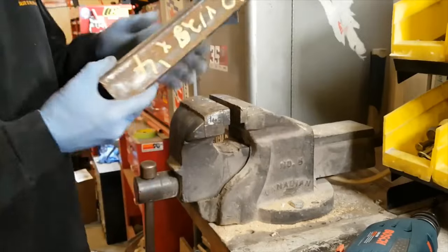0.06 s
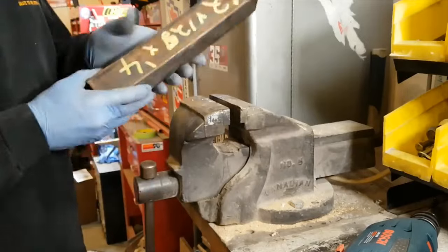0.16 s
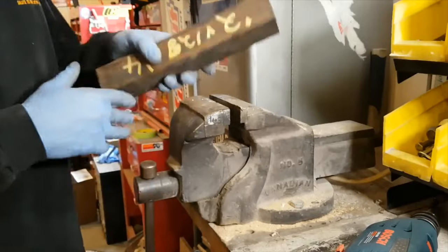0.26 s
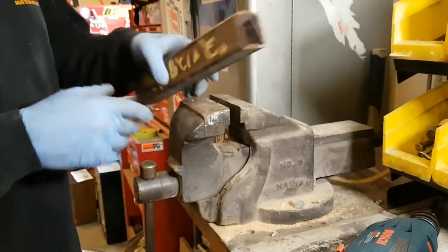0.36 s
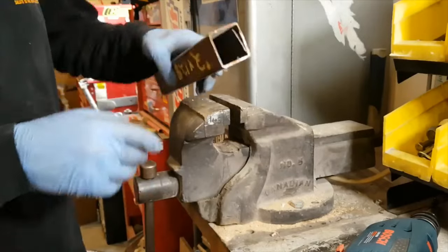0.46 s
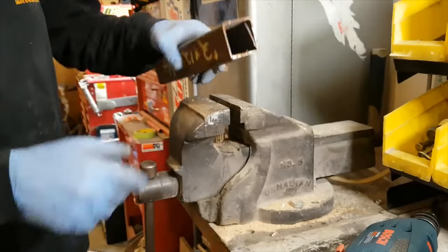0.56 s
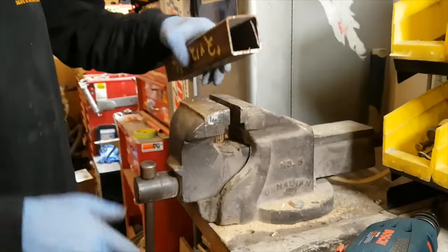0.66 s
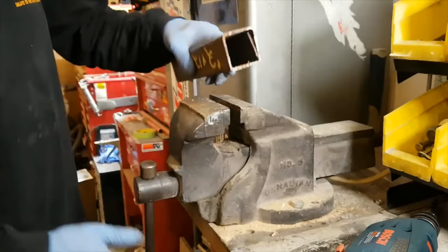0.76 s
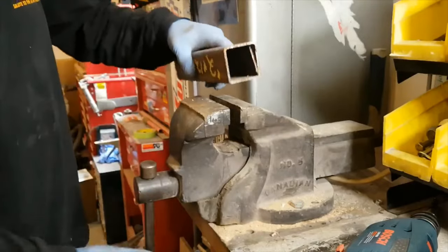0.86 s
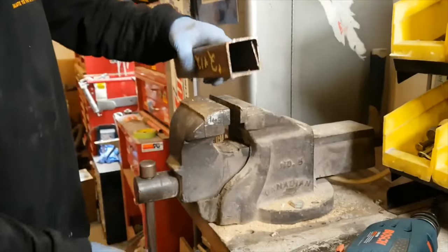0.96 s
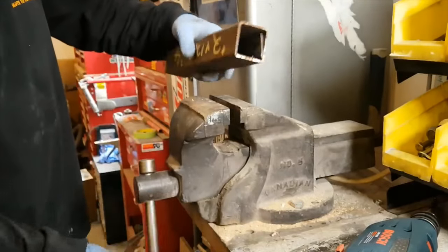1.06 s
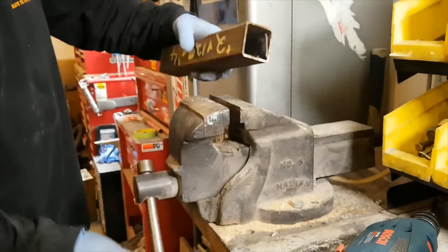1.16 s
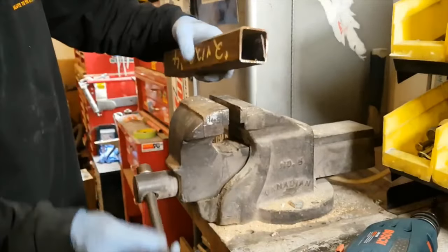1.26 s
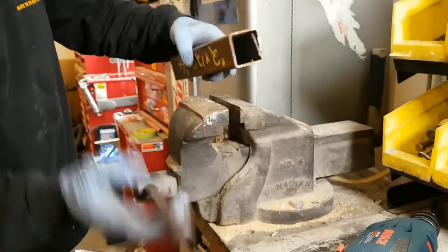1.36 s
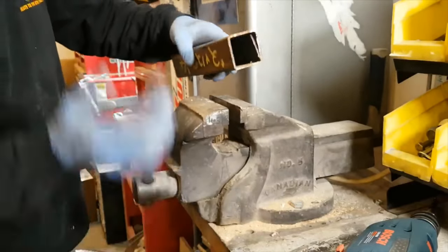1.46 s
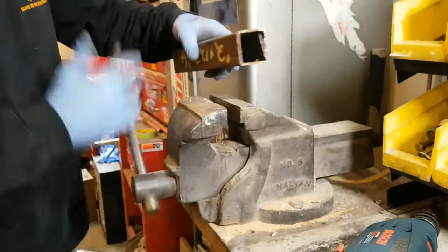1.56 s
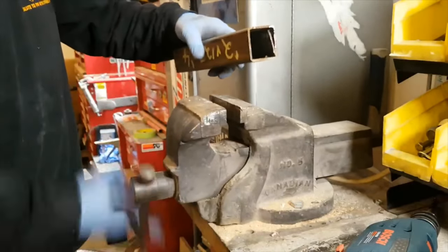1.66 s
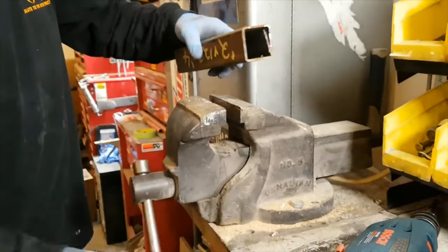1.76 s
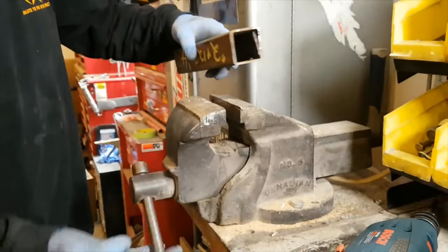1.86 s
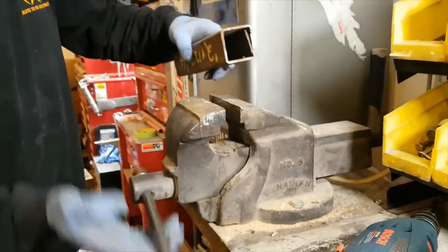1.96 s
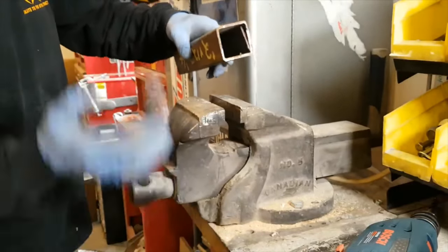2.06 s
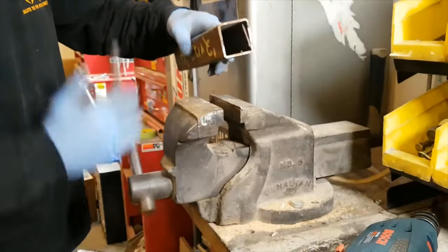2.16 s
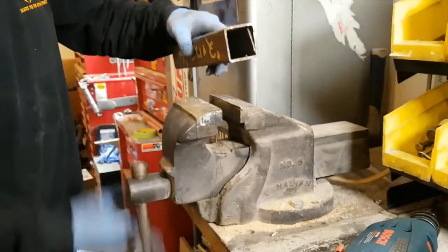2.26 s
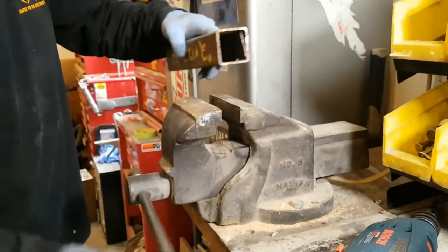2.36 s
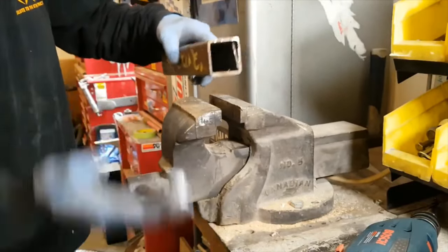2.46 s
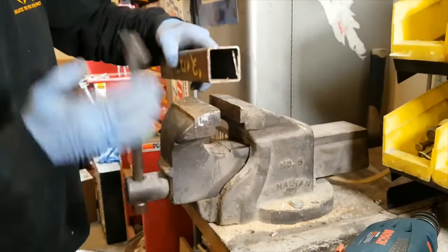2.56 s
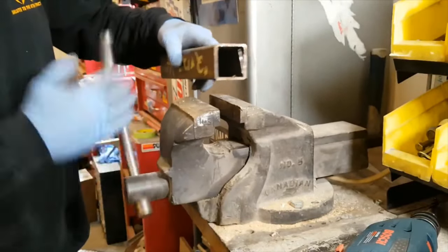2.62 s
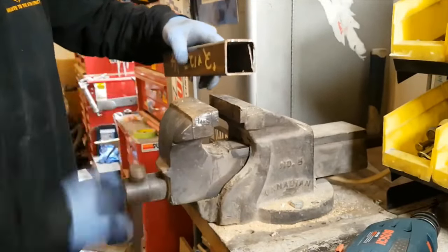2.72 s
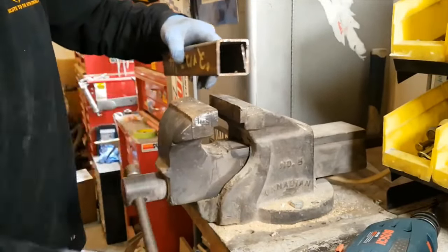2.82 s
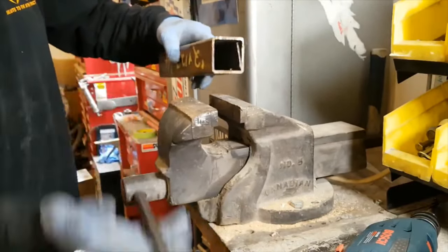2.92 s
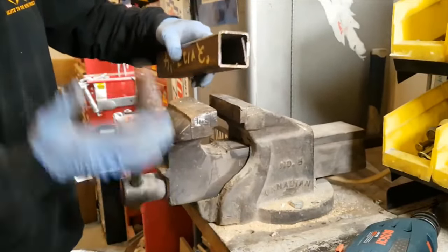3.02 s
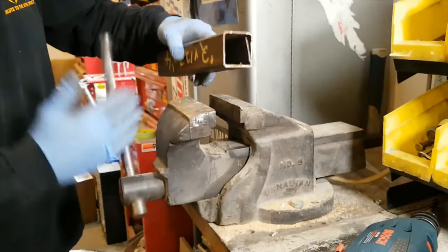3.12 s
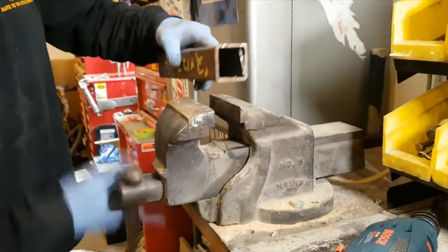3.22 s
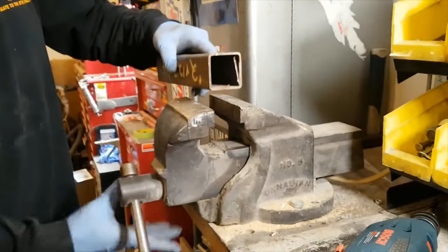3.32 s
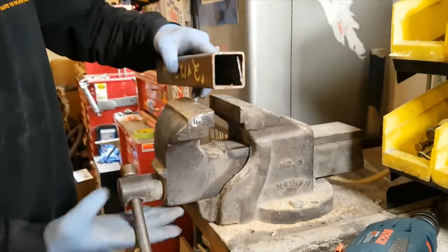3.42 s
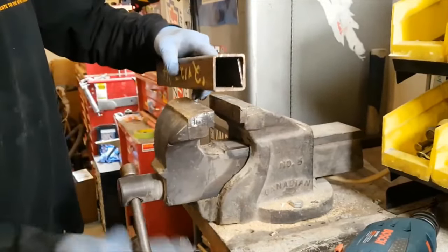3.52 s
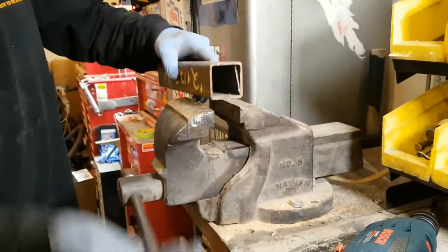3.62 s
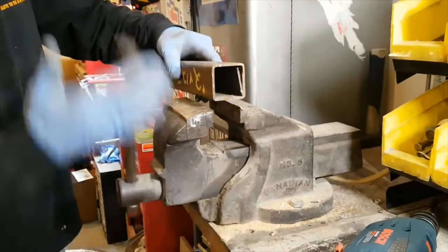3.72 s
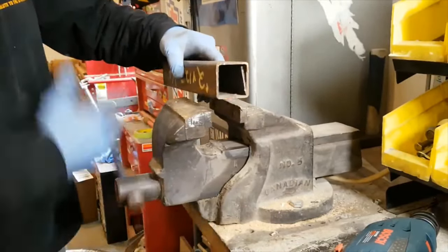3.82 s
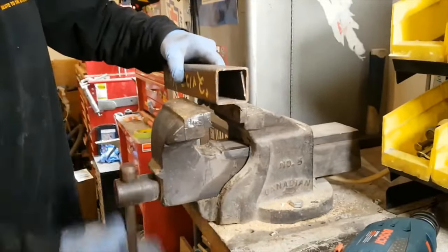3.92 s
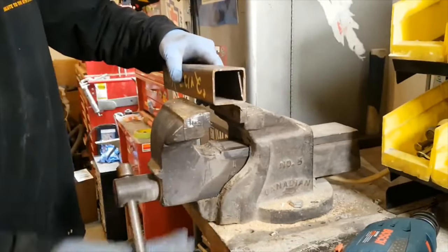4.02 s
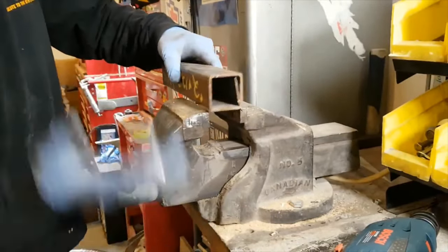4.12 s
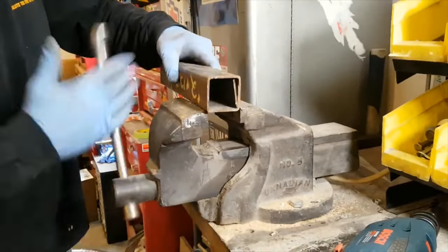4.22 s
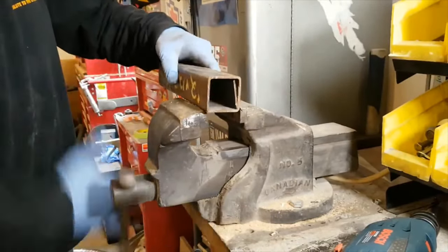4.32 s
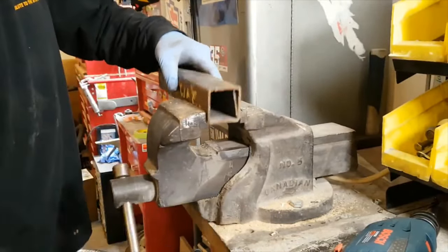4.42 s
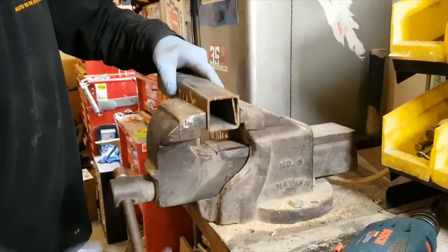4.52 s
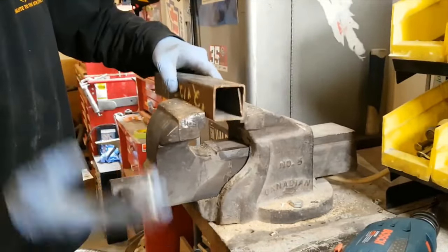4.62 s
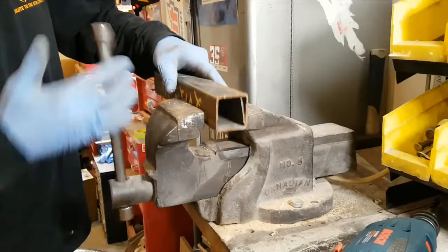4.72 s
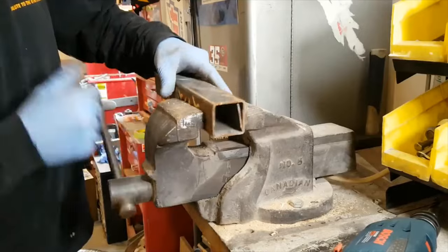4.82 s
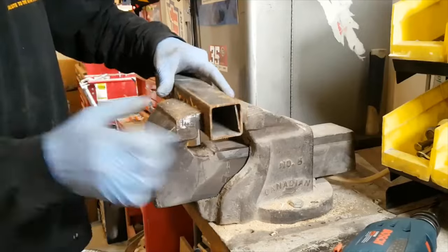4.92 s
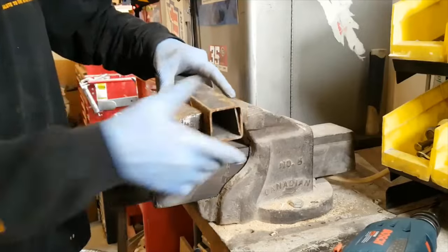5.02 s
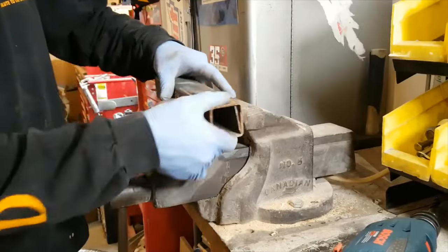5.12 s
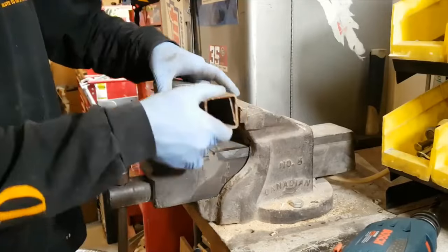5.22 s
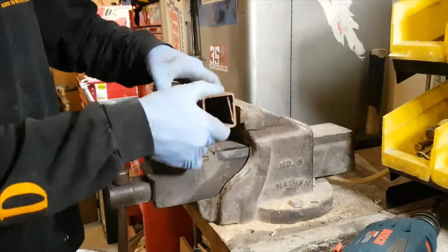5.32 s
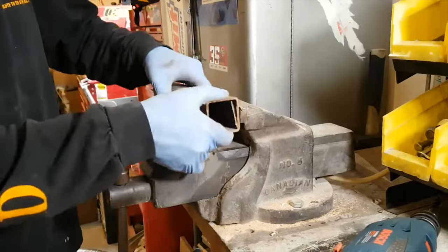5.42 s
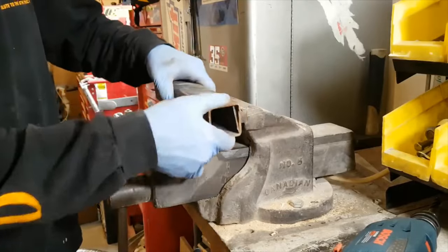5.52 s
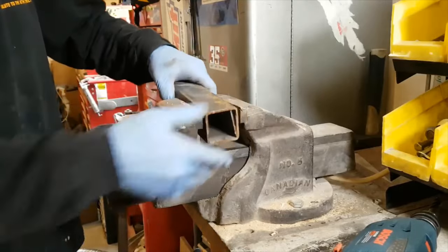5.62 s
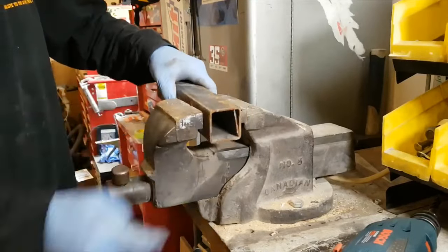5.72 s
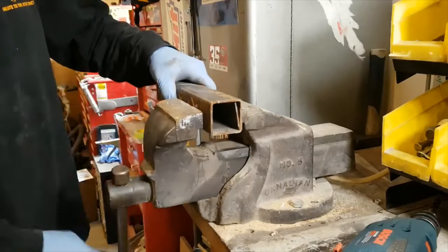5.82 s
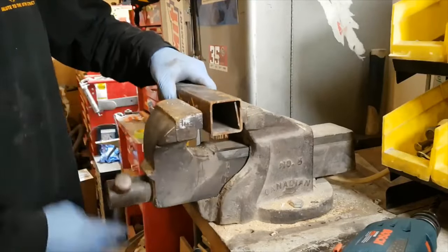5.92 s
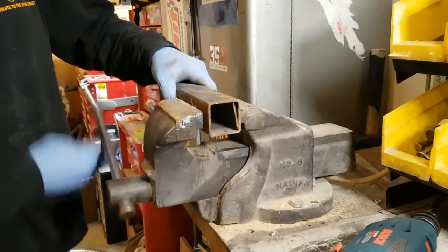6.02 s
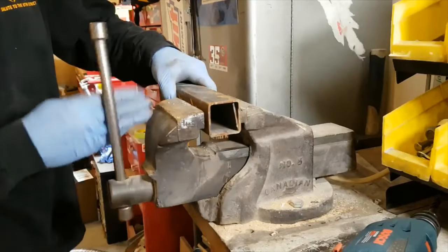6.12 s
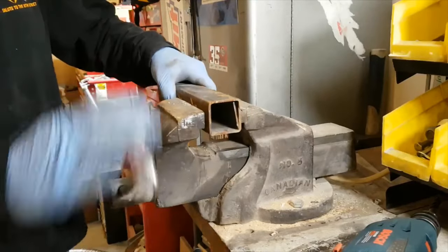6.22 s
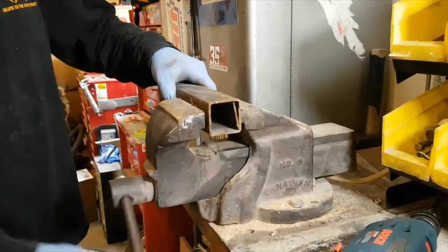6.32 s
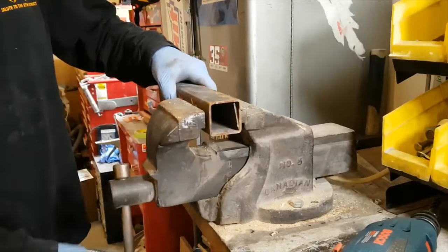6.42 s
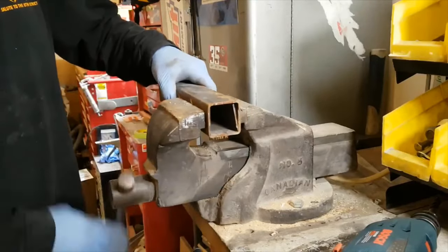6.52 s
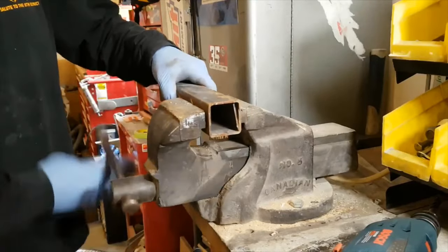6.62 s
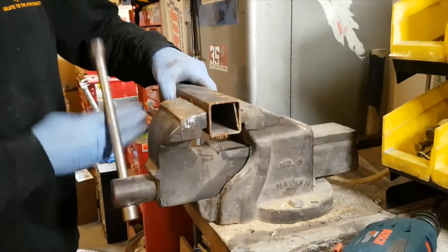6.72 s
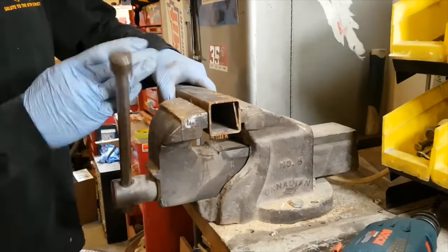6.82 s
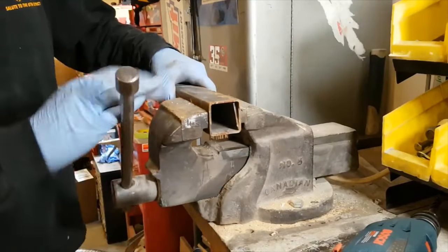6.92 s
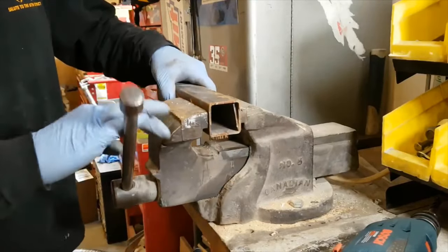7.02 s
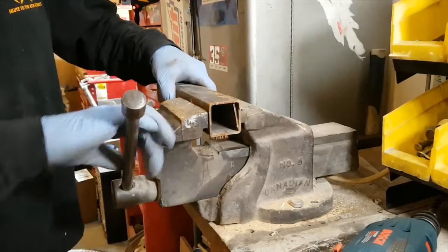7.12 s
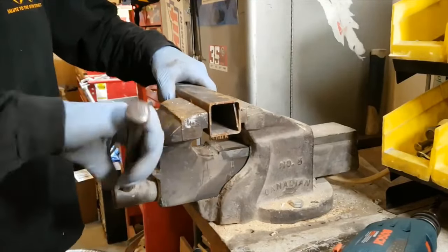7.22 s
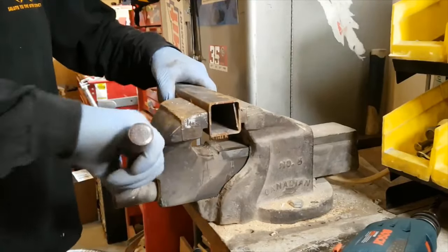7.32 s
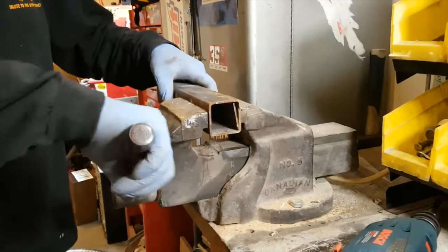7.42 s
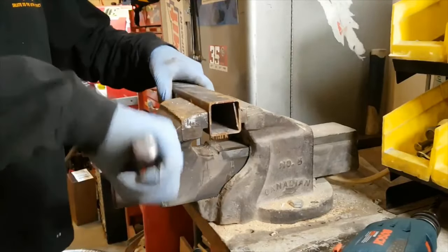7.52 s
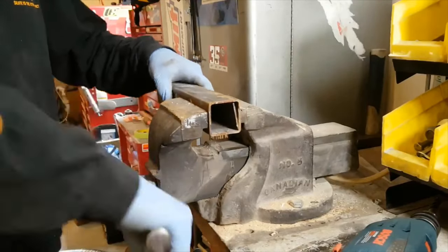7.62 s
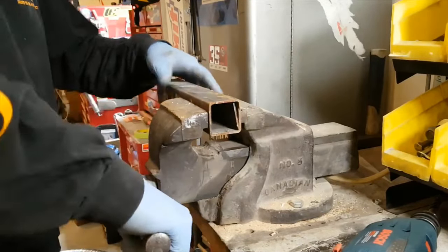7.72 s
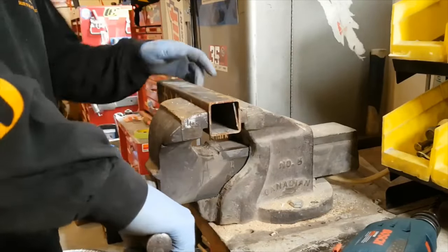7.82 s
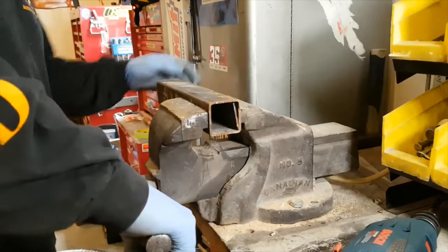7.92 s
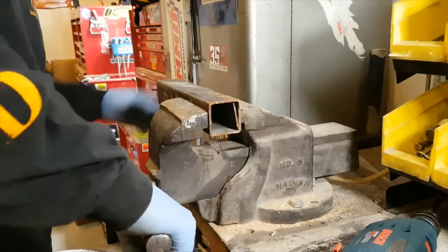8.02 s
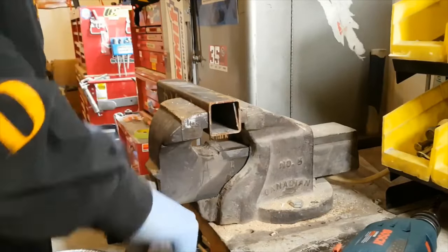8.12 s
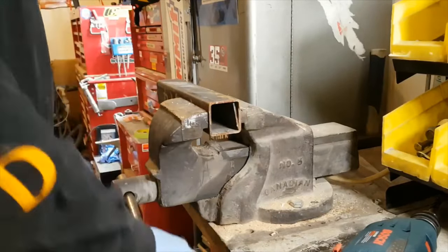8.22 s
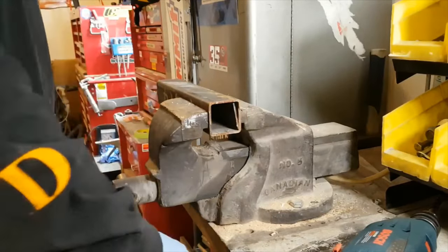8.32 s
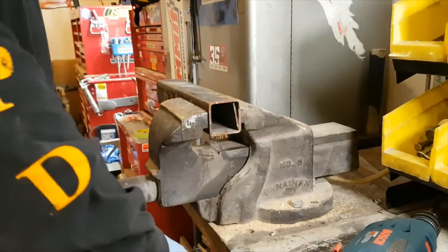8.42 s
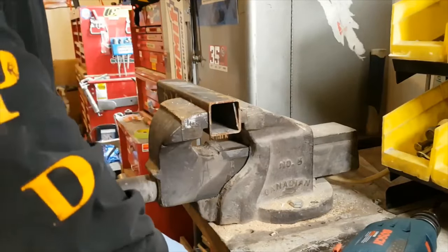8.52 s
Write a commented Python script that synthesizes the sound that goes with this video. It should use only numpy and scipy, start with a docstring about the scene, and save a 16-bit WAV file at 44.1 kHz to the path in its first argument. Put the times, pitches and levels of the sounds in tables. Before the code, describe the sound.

Quiet room air and a steady, slightly wavering hum lie under everything. After about a second of light glove rubbing, a heavy cast-iron vise rattles and knocks with each push of its loose handle. The blows are woody-dull below and metallic on top, with short shop echoes. Bright tube clinks and plate pings come in the middle, then a short scrape, final hard clanks, a pause, a soft sleeve rub and faint clinks. Close microphones.

```python
"""Over the quiet air of a workshop, steady noise, a motor hums in wavering sine tones.
Gloves rustle first, as coloured noise grains; then the handle of a heavy bench vise is spun by one hand
while the other holds a square steel tube. Loose screw and jaw knock and judder: clicks drive body resonances.
Jaw plate pings, tube and handle bar clinks, a scrape of the tube and clanks of the collar join as decaying
modes; a few clinks and a last soft rub close the scene. Near sounds excite the sparse echoes of the shop."""
import sys
import numpy as np
from scipy import signal
from scipy.fft import rfft, irfft
from scipy.io import wavfile
from scipy.ndimage import uniform_filter1d

SR = 44100
rng = np.random.default_rng(int(sys.argv[2]) if len(sys.argv) > 2 else 0)


def file_out(sig):
    """Save sig as 16-bit WAV at sys.argv[1]."""
    # one column per channel
    cols = np.atleast_2d(sig).T
    # limit, then scale
    lim = np.clip(cols, -1, 1)
    pcm = np.round(lim * 32767).astype(np.int16)
    wavfile.write(sys.argv[1], SR, pcm)


N = 377937


def amp(db):
    """Decibel law: amplitude ratio of a level."""
    return 10 ** (np.asarray(db) / 20)


def evened(x):
    """Power normalization: scale to rms 1."""
    return x / np.sqrt(np.mean(x ** 2) + 1e-20)


def read(points, hz):
    """Interpolation of a curve along logarithmic frequency."""
    f, value = np.transpose(points)
    return np.interp(np.log(hz + 1), np.log(f + 1), value)


def add(mix, s, sound):
    """Superposition: sound joins mix at time s, cut off at its end."""
    part = mix[round(s * SR):][:len(sound)]
    part += sound[:len(part)]


def causal(db):
    """Minimum phase: the most prompt causal response with this gain shape, energy 1."""
    log_gain = np.log(amp(np.r_[db, db[-2:0:-1]]))
    phase = -signal.hilbert(log_gain).imag
    response = np.fft.ifft(np.exp(log_gain + 1j * phase)).real[:len(db)]
    return response / np.linalg.norm(response)


def sparse(per_s, spread_db):
    """Random impulse train: clicks of random sign and moment, a few much larger; rms 1."""
    size = amp(spread_db * np.minimum(rng.exponential(1, N), 4)) * rng.choice([-1, 1], N)
    return evened(size * (rng.random(N) < per_s / SR))


def slow_noise(shape, width):
    """Smoothed noise: two moving averages of width samples leave only slow changes."""
    return evened(uniform_filter1d(uniform_filter1d(rng.standard_normal(shape), width), width))


# colour of the air noise: (f/Hz, relative level/dB)
AIR_COLOUR = [(20, -27), (60, -16), (100, -16), (250, -16), (420, -19), (860, -27.5), (2000, -33),
              (5000, -42.5), (16000, -47)]
# left-right correlation of the air noise: (f/Hz, correlation)
AIR_CORRELATION = [(100, 0.32), (400, 0.34), (1500, 0.071), (5000, 0.0545)]
AIR_DB = -58  # rms over both ports


def air():
    """Partial coherence: steady coloured noise, partly shared by the two ports."""
    hz = np.fft.rfftfreq(N, 1 / SR)
    left, other = rfft(rng.standard_normal((2, N)))
    same = np.clip(read(AIR_CORRELATION, hz), -1, 1)
    right = same * left + np.sqrt(1 - same ** 2) * other
    noise = irfft(amp(read(AIR_COLOUR, hz)) * np.array([left, right]), N)
    return amp(AIR_DB) * evened(noise)


# motor tones: (f/Hz, rms level/dB midway between the ports), about which each tone wavers
HUM_TONES = [(118.4, -51), (253.0, -63.5), (419.9, -65.5), (506.0, -74.5)]


def motor_hum():
    """Amplitude and frequency modulation: motor tones waver slightly, louder in the right port."""
    t, tones = np.arange(N) / SR, 0
    for f, db in HUM_TONES:
        waver = slow_noise(N, 6000)
        phase = 2 * np.pi * f * t + np.cumsum(waver) * 2.3 / SR  # 2.3 rad/s rms deviation
        tones = tones + np.sqrt(2) * amp(db + 0.43 * waver) * np.sin(phase)
    return tones * amp([[-1.2], [1.2]])


# rubs of glove and sleeve: (middle t/s, relative level/dB, half length to 1/e t/s, tilt/dB per octave)
GLOVE_RUBS = [(0.018, -60, 0.025, 6), (0.264, -57, 0.048, 0), (0.309, -53.5, 0.018, 2),
              (0.435, -61, 0.057, -2), (0.601, -59, 0.028, 1), (1.178, -64, 0.027, 3),
              (3.622, -58, 0.038, 3.5), (5.198, -61, 0.061, -1.5), (6.337, -58, 0.071, 2),
              (7.269, -64.5, 0.099, 3), (7.535, -62, 0.059, 0), (7.744, -51.5, 0.1, -5),
              (8.448, -53, 0.29, -8)]
# colour of rubbed cloth before each rub's tilt: (f/Hz, relative level/dB)
CLOTH_COLOUR = [(300, -5), (1200, -1), (3000, 1), (6000, -4), (12000, -1), (16000, -7)]
# bright ticks of glove and handle ends: (t/s, relative peak level/dB, t60/s)
GLOVE_TICKS = [(1.844, -50.5, 0.083), (2.465, -43.5, 0.082), (2.933, -39.5, 0.048), (3.2784, -36, 0.014),
               (3.4175, -40.5, .07), (4.534, -40, 0.12), (5.894, -45, 0.067), (8.2165, -52, 0.046)]


def gloves():
    """Friction noise: grains of rubbing cloth and nitrile, unlike at the two ports, and short bright ticks."""
    hz = np.fft.rfftfreq(1024, 1 / SR)
    t = np.arange(SR // 2) / SR - .25  # each sound is centred on its moment
    out = np.zeros((2, N + SR))
    for s, db, half, tilt_db in GLOVE_RUBS:
        grains = rng.standard_normal((2, len(t))) * amp(0.99 * rng.standard_normal((2, len(t))))
        colour = causal(read(CLOTH_COLOUR, hz) + tilt_db * np.log2((hz + 200) / 4000))
        rub = signal.oaconvolve(amp(db) * grains * np.exp(-(t / half) ** 2), colour[None])
        add(out.T, s, rub.T)
    bright = causal(read([(2000, -8.0), (6000, -10.0), (10000, -7.0), (16000, -9.5)], hz))
    for s, peak_db, t60 in GLOVE_TICKS:
        envelope = amp(peak_db - 60 * np.maximum(t, 0) / t60) * np.clip(20 * t / t60, 0, 1)
        burst = envelope * rng.standard_normal((2, len(t)))
        crossed = burst + 0.13 * burst[::-1]  # each port hears a little of the other
        add(out.T, s, signal.oaconvolve(crossed, bright[None]).T)
    return out[:, SR // 4:][:, :N]


# decay of the shop by band: (f/Hz, t60/s)
SHOP_DECAY = [(80, 0.44), (250, 0.71), (700, 0.46), (2000, 0.4), (5000, 0.63), (12000, 0.76)]
# left-right correlation of the reflections: (f/Hz, correlation)
TAIL_CORRELATION = [(100, .95), (400, .7), (1500, .3), (4000, 0)]


def shop(x):
    """Reverberation: sparse reflections of random sign decay by band; the ports share mostly the bass."""
    taps = np.zeros((2, SR))
    at = np.arange(60, SR - 20, 20) + rng.integers(0, 20, (2, (SR - 61) // 20))  # one in 20 samples
    np.put_along_axis(taps, at, rng.choice([-1., 1.], at.shape), 1)
    hz, t, z = signal.stft(taps, SR, nperseg=512)
    same = np.clip(read(TAIL_CORRELATION, hz), 0, 1)[:, None]
    z = np.array([z[0], same * z[0] + np.sqrt(1 - same ** 2) * z[1]])
    early = 1 + 1.62 * amp(-60 * t / 0.09)  # bench and wall answer first
    fall = amp(-60 * t / read(SHOP_DECAY, hz)[:, None]) * early
    tail = signal.istft(z * fall, SR, nperseg=512)[1]
    return signal.fftconvolve(x[None], tail / np.linalg.norm(tail[0]), axes=1)[:, :N]


BITE_DB, BITE_S = 16, 0.006  # a stroke starts this much fainter; time constant of its bite
LET_GO_DB_PER_S = 326.5  # how fast a stroke stops
COAST_DB, COAST_DB_PER_S = -12.5, 90.5  # the loose parts rattle on, fainter and dying more slowly


def strokes(rows):
    """Envelope of forced motion, level in dB: each stroke bites quickly, holds, lets go and coasts."""
    out, t = np.full(N, -120.), np.arange(N) / SR
    for s, length, first_db, last_db, *_ in rows:
        after = np.maximum(t - s - length, 0)
        fall = np.maximum(-LET_GO_DB_PER_S * after, COAST_DB - COAST_DB_PER_S * after)
        bite = -BITE_DB * np.exp(-np.maximum(t - s, 0) / BITE_S)
        hold = np.interp(t, [s, s + length], [first_db, last_db]) + bite
        out = np.where(t < s, out, np.maximum(out, hold + fall))
    return out


# judder of the screw under pushes on the handle, before the body shares:
# (start t/s, length t/s, first drive level/dB, last drive level/dB, load on the bench level/dB)
SCREW_TURNS = [(1.451, 0.014, -42.5, -31, 5.5), (1.461, 0.11, -16, -11.5, 0.5),
               (2.072, 0.025, -19, -14, -4), (2.109, 0.076, -13, -12, 0), (2.603, 0.018, -27, -25, 4.5),
               (2.62, 0.028, -18, -14, -5.5), (2.648, 0.035, -10, -15, -1), (2.8, 0.015, -23.5, -43, 0.5),
               (3.695, 0.073, -21, -17, 1.5), (3.77, 0.12, -11, -19.5, 2.5), (4.128, .03, -27.5, -21, 3.5),
               (4.165, 0.11, -15.5, -10.5, 1.5), (4.643, 0.36, -16.5, -18, 2),
               (4.954, 0.024, -18, -17, -5.5), (5.907, 0.08, -35.5, -41.5, 6),
               (5.994, 0.084, -14.5, -18.5, -1), (6.136, 0.097, -13.5, -13.5, 1),
               (6.759, 0.041, -19, -15, 1.5), (6.82, 0.024, -15.5, -9, -5)]
# knocks of jaw and handle: (t/s, drive peak level/dB, hardness: 0 dull thud into the bench, 1 steel on steel)
JAW_KNOCKS = [(1.093, -43.5, 0.069), (1.156, -27, 0.042), (1.499, -10, 0.83), (1.528, -12, 0.49),
              (1.567, -17, 0.48), (2.004, -19.5, 0.23), (2.324, -10, 0.48), (2.411, -5, 0.56),
              (2.806, -14, 0.46), (2.982, -25.5, 0.077), (3.119, -20.5, 0.23), (3.15, -18.5, 0.29),
              (3.187, -17.5, 0.36), (3.295, -10.5, 0.5), (3.306, -17, 0.17), (3.617, -32.5, 0.35),
              (3.702, -8, 0.61), (3.726, -6.5, 0.67), (3.779, -9, 0.78), (3.962, -18.5, 0.76),
              (4.162, -6.5, 0.69), (4.468, -19, 0.82), (4.605, -17, 0.63), (4.683, -21.5, .5),
              (4.721, -6, 0.71), (4.805, -5.5, 0.67), (4.83, -11, 0.78), (4.984, -5.5, 0.54),
              (5.265, -30, 0.15), (5.741, -21.5, 0.74), (5.904, -22, 0.7), (5.978, -9, 0.49),
              (6.191, -8, 0.67), (6.766, -12, 0.87), (8.352, -32.5, 0.83), (8.438, -26.5, 0.78),
              (8.529, -31.5, 0.86)]
# broad colour of the vise: (f/Hz, relative level/dB)
VISE_COLOUR = [(30, -30.5), (86, -5), (252, -5.5), (404, -3.5), (684, -1.5), (1390, -3), (1810, -9),
               (2230, -13.5), (2620, -20.5), (2950, -24), (3650, -31), (5590, -45), (12000, -58),
               (16000, -74)]
# resonances of casting and bench: (f/Hz, nominal width f/Hz, relative prominence level/dB)
BODY_MODES = [(88, 22, 8), (222, 55, 7), (500, 38, 8), (673, 35, 10), (1198, 30, 6), (1678, 45, 9),
              (1803, 170, 11), (2125, 45, 10), (2440, 60, 7), (2583, 170, 10), (3164, 25, 12),
              (3660, 90, 10), (4850, 90, 8)]
CONTACTS = 3  # loose spots
SLIPS_PER_S, SLIP_SPREAD_DB = 170, 2.5
TAKE_TURNS_DB = 5  # the contacts take turns at carrying the load
BOOM_DB, EDGE_DB = (12.5, -10), (-38, 13)  # bench boom and metal edge above the peak: dull, hard knock


def vise():
    """Source and filter: clumped slips and knocks drive bench, casting and metal edges of one modal body."""
    hz = np.fft.rfftfreq(8192, 1 / SR)
    low = 1 / (1 + (hz / 350) ** 6)
    high = 1 / (1 + (2300 / (hz + 1)) ** 4)
    shares = [(1 - low) * (1 - high), low, high]  # casting, bench, edges
    level_db = strokes(SCREW_TURNS)
    start, load_db = np.transpose(SCREW_TURNS)[[0, -1]]
    load_db = load_db[np.maximum(np.searchsorted(start * SR, np.arange(N)) - 1, 0)]
    bench_db = load_db - 3.0 - 0.35 * (level_db + 16.5)
    edges_db = -4.5 + 1.53 * (level_db + 14.5)  # harder slips are brighter
    above_db = 0, bench_db, edges_db
    t, out = np.arange(1800) / SR, np.zeros((CONTACTS, N))
    envelope = amp(-60 * t / 0.044) * (1 - np.exp(-t / 0.0016))  # a knock is a short chatter of contacts
    load = amp(TAKE_TURNS_DB * slow_noise((CONTACTS, N), 700))
    load = load / np.linalg.norm(load, axis=0)
    for spot in range(CONTACTS):  # each reaches the modes differently and chatters at its own moments
        db = read(VISE_COLOUR, hz)
        for f, width, prominence_db in BODY_MODES:
            height_db = 0.7 * prominence_db * rng.uniform(0.68, 1.33)
            centre = f * (1 + 0.012 * rng.standard_normal())
            db = db + height_db / (1 + (2 * (hz - centre) / width) ** 2)
        slips = evened(load[spot] * sparse(SLIPS_PER_S, SLIP_SPREAD_DB))
        chatter = rng.standard_normal((len(JAW_KNOCKS), len(t))) * envelope
        for k, share in enumerate(shares):
            drive = slips * amp(level_db + above_db[k]) * (level_db > -100)
            dull_db, hard_db = [(0, 0), BOOM_DB, EDGE_DB][k]
            for (s, peak_db, hard), burst in zip(JAW_KNOCKS, chatter):
                add(drive, s, amp(peak_db + dull_db + hard * (hard_db - dull_db)) * burst)
            body = causal(db + 10 * np.log10(share ** 2 + 1e-8))
            out[spot] += signal.oaconvolve(drive, body)[:N]
    return out / np.sqrt(CONTACTS)


SPLIT = 1.006  # pitch ratio within a pair of modes


def ringing(table, t):
    """Modal decay, one row a mode: uneven walls split it in two; contact damps the first moments most."""
    hz, db, t60 = np.transpose(table)[:, :, None]
    pairs = np.sin(2 * np.pi * hz * t) + .4 * np.sin(2 * np.pi * hz * SPLIT * t)
    return hz, amp(db - 60 * t / t60) * pairs * (1 + 1.3 * amp(-60 * t / 0.55))


# pings of the jaw plate: (t/s, strike level/dB)
PLATE_PINGS = [(2.14, -36), (4.252, -34.5), (4.311, -35.5), (4.45, -39), (5.745, -43)]
# modes of the loose jaw plate: (f/Hz, relative level/dB, undamped t60/s)
PLATE_MODES = [(3160, 0, .45), (3240, -2, .1)]
# clanks of the handle against the collar: (t/s, strike level/dB)
COLLAR_CLANKS = [(6.768, -32), (6.776, -30), (6.832, -30.5), (6.846, -29)]
# modes of the screw's collar: (f/Hz, relative level/dB, undamped t60/s)
COLLAR_MODES = [(2530, -2.5, 0.05), (3640, -10, .04), (4860, -15, .07)]


def plate_and_collar():
    """Impulse excitation: each blow lets the free modes of jaw plate or collar ring out."""
    out, t = np.zeros(N), np.arange(SR // 2) / SR
    for blows, modes in [(PLATE_PINGS, PLATE_MODES), (COLLAR_CLANKS, COLLAR_MODES)]:
        for s, db in blows:
            add(out, s, amp(db) * ringing(modes, t)[1].sum(0))
    return out


# steel meets steel:
# (t/s, tube level/dB, f/Hz the blow drives most, handle bar level/dB, crack level/dB)
STEEL_CLINKS = [(3.967, -56, 3570, -41, -58), (4.442, -27, 4000, -34.5, -59),
                (4.606, -34.5, 8600, -65, -50), (5.745, -29, 2650, -54, -47),
                (6.592, -40, 1310, -67.5, -71), (8.351, -41, 300, -49, -55), (8.436, -53, 302, -45.5, -48),
                (8.527, -52, 304, -45, -52)]
# modes of the tube: (f/Hz, relative level/dB, undamped t60/s)
TUBE_MODES = [(2068, -7, 0.14), (3880, -12.5, 0.18), (5180, -8.5, 0.12), (6000, -14.5, 0.085),
              (6600, -18.5, 0.1), (8170, -27.5, 0.23), (10000, -16.5, 0.06), (10700, -17, 0.076)]
# modes of the handle bar: (f/Hz, relative level/dB, undamped t60/s)
BAR_MODES = [(290, -6.5, 0.91), (3485, -8, 0.37), (4385, -14, .3), (5930, -9, .08)]
HELD_S = 0.14  # until a grip stops the ring


def clinks():
    """Selective excitation: a blow favours modes of tube and bar near one pitch, until a grip damps them."""
    out, t = np.zeros(N), np.arange(SR // 2) / SR
    tube_hz, tube = ringing(TUBE_MODES, t)
    bar_hz, bar = ringing(BAR_MODES, t)
    for s, tube_db, most_hz, bar_db, crack_db in STEEL_CLINKS:
        ring = 0
        for db, hz, modes in [(tube_db, tube_hz, tube), (bar_db, bar_hz, bar)]:
            ring = ring + (amp(db - 5.8 * np.log2(hz / most_hz) ** 2) * modes).sum(0)
        crack = signal.lfilter([1, 1, -1, -1], [1], rng.standard_normal(len(t)))
        crack = crack * amp(crack_db - 60 * t / 0.092)
        add(out, s, ring / (1 + np.exp((t - HELD_S) / .01)) + crack)
    return out


# scrapes of the tube along the jaw: (start t/s, length t/s, first drive level/dB, last drive level/dB)
TUBE_SCRAPES = [(5.262, 0.1, -45.5, -62), (5.43, 0.027, -54, -57.5)]


def scrape():
    """Frictional excitation: dense slips drive damped modes of tube, bar and jaw plate, and hiss."""
    t = np.arange(SR // 2) / SR
    hz, tube = ringing(TUBE_MODES, t)
    tube = (tube * amp(-3.0 * abs(np.log2(hz / 6000)))).sum(0)
    bar = ringing(BAR_MODES, t)[1][1:].sum(0)  # without its lowest mode
    plate = ringing(PLATE_MODES, t)[1].sum(0)
    ring = (tube + 0.33 * bar + 0.36 * plate) * amp(-60 * t / .07)
    ring = ring / np.linalg.norm(ring)
    ring[:3] += 0.26 * np.array([1, 0, -1])  # the bare grit of each slip
    return signal.oaconvolve(sparse(2100, 3.0) * amp(strokes(TUBE_SCRAPES)), ring)[:N]


# phase by which the left port leads: (f/Hz, phase/rad)
PORT_LEAD = [(100, -0.78), (400, 0.38), (800, -0.96), (1300, -1.77), (2000, -1.6), (3000, -0.89)]
# left minus right port: (f/Hz, level/dB)
PORT_DIFFERENCE = [(60, -1.5), (240, -3.5), (3770, -1), (15000, -2.5)]


def scene():
    """Superposition and interaural difference: direct sounds and echoes reach ports unlike in level and phase."""
    casting, soft = vise(), gloves()
    steel = plate_and_collar() + clinks() + scrape()
    near = amp(-7.0) * casting.sum(0) + steel
    near = near + shop(amp(-0.5) * steel + amp(-2.0) * soft[0])
    near = near + amp(-3.5) * sum(shop(spot) for spot in casting)  # each contact has its own reflections
    hz = np.fft.rfftfreq(N, 1 / SR)
    half = amp(read(PORT_DIFFERENCE, hz) / 2) * np.exp(.5j * read(PORT_LEAD, hz))
    ports = irfft(rfft(near) * np.array([half, 1 / half]), N)
    return ports + soft + air() + motor_hum()


EDGE_HZ = 16100  # upper band limit


def record(dry):
    """Saturation and band limiting: the input stage rounds off the highest peaks, then a low-pass acts."""
    held = .9 * np.tanh(dry / .9)
    lowpass = signal.firwin(511, EDGE_HZ, window=("kaiser", 9), fs=SR)
    return signal.oaconvolve(held, lowpass[None], "same")


dry = scene()
out = record(dry)
file_out(out)
```